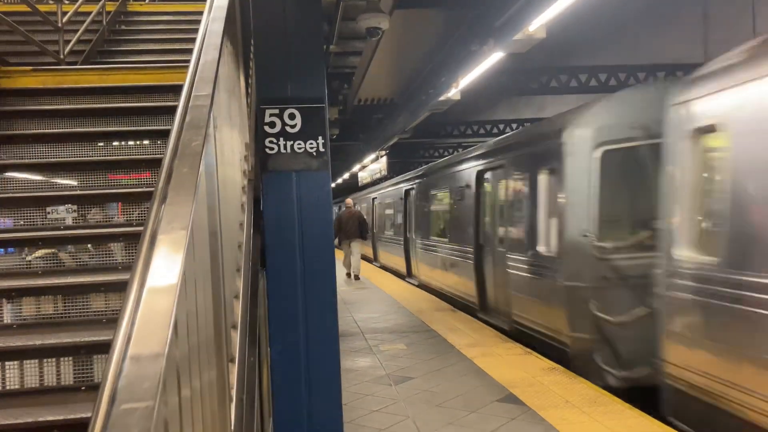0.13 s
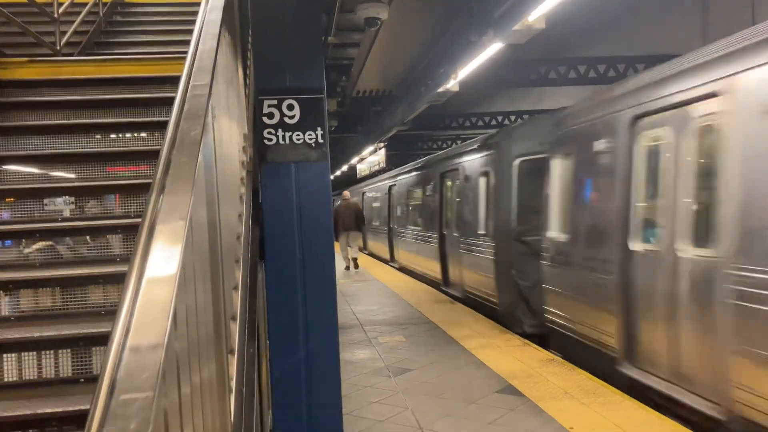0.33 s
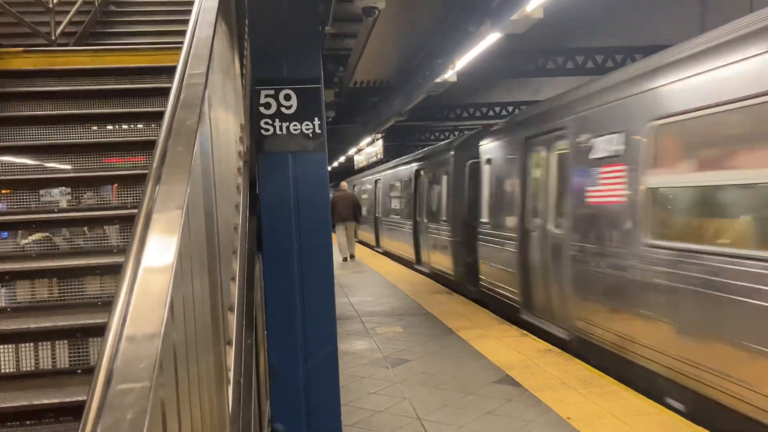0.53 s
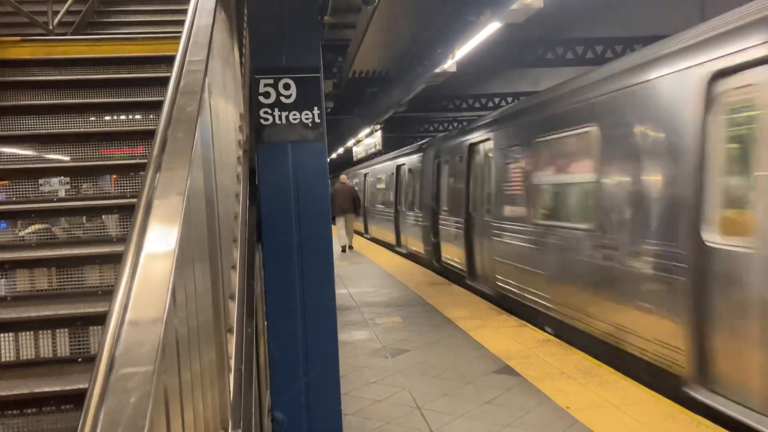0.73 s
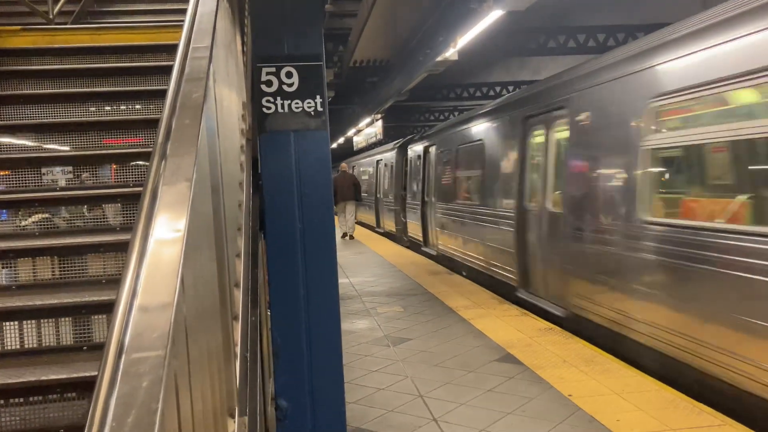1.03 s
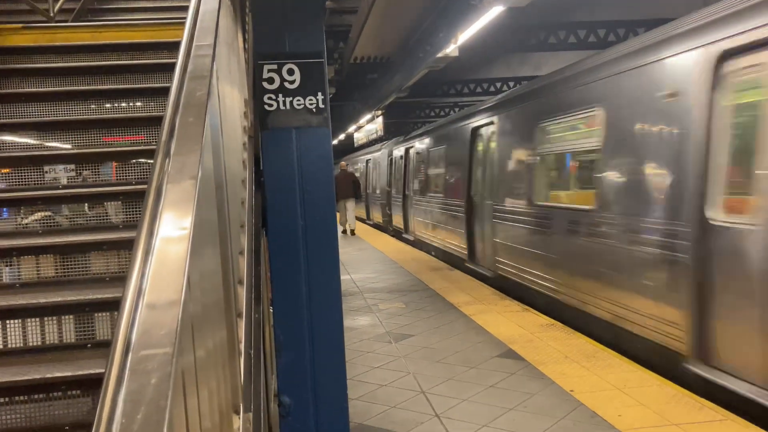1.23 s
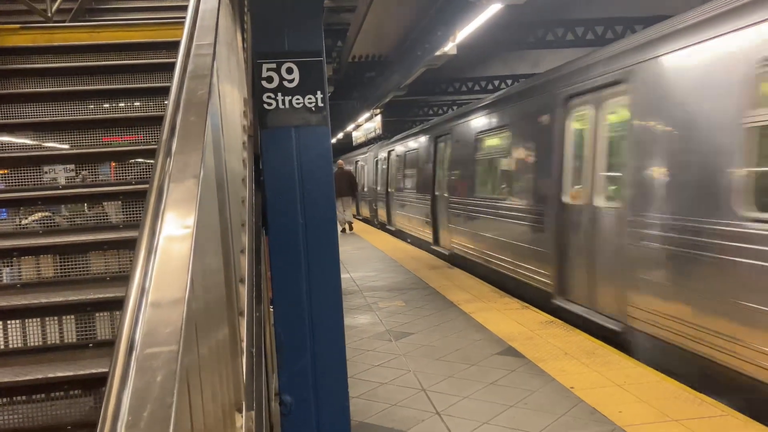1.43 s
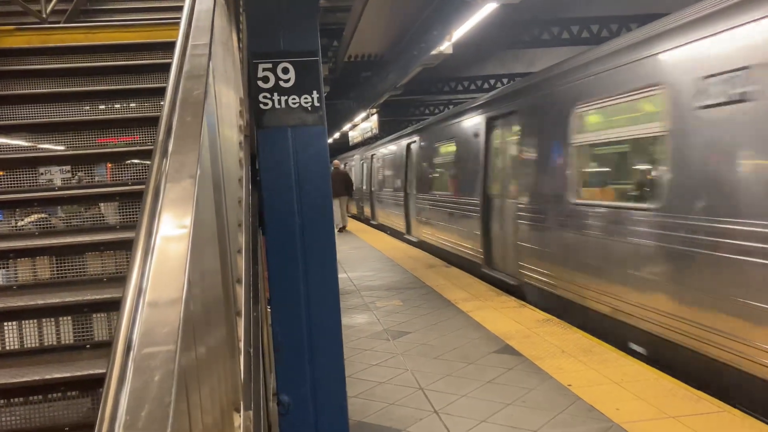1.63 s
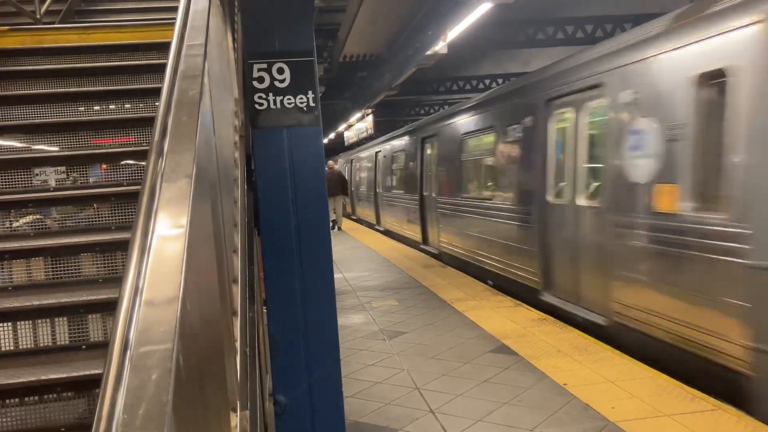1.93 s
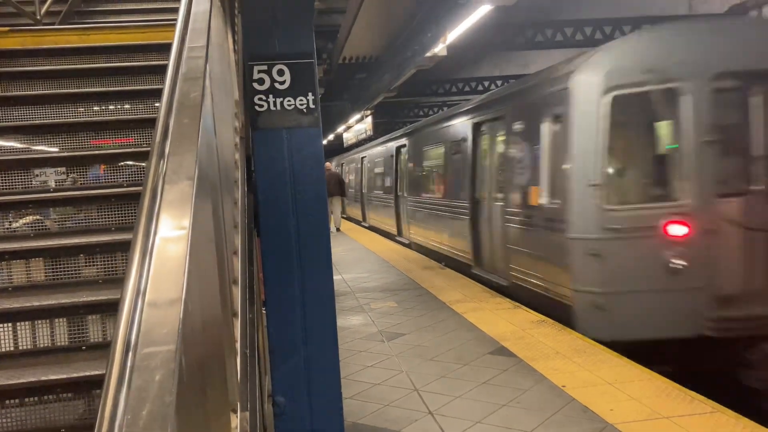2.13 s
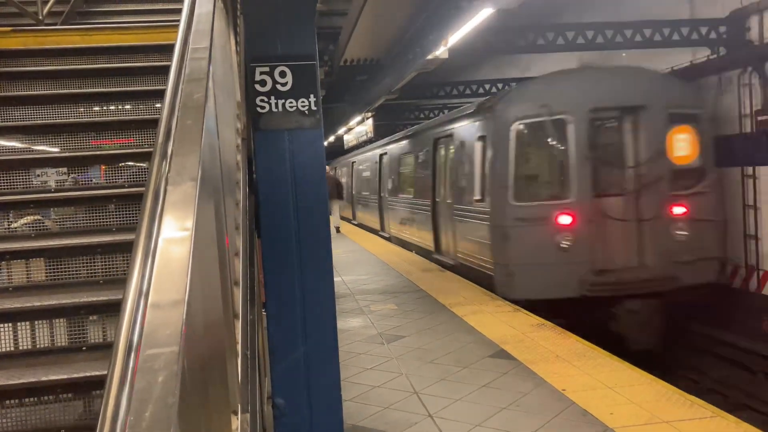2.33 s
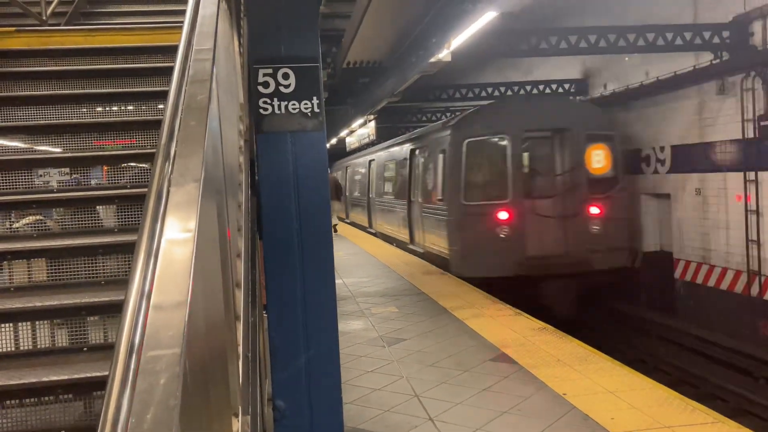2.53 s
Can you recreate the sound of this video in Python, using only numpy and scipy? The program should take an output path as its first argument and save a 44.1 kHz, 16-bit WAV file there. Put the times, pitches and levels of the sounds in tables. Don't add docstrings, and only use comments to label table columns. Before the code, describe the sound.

Close stereo pickup on an underground platform: a train already rolling by roars steadily, with rushing wheels, body jolts, short metallic pings and faint air hiss, then heavier joint knocks and a thin motor hum at the end.

```python
import sys
import numpy as np
from scipy import signal
from scipy.io import wavfile
from scipy.ndimage import uniform_filter1d

SR = 44100
rng = np.random.default_rng(int(sys.argv[2]) if len(sys.argv) > 2 else 0)


def store_pcm(level_fs):
    pcm = np.round(np.clip(level_fs, -1, 1) * 32767).astype(np.int16)
    wavfile.write(sys.argv[1], SR, np.atleast_2d(pcm).T)


def gain_from_db(level_db):
    decades = np.asarray(level_db, float) / 20
    return 10 ** decades


N = 118629

# t/s, roar level/dB, floor shake/dB, howl over the roar/dB
PASSING = [(0, -16.5, -31.5, 4), (.1, -16.5, -36, -1), (.22, -20, -34, 0), (.38, -16, -36.5, -4),
           (.55, -19, -34, 2.5), (.75, -20, -34, 2), (.95, -20.5, -32, 1), (1.18, -19.5, -33, -1),
           (1.4, -20.5, -32, 1.5), (1.55, -20.5, -33.5, 6.5), (1.7, -14, -28.5, 1), (1.83, -21.5, -35.5, 3),
           (1.97, -16.5, -31, 7), (2.12, -17, -32, 5.5), (2.24, -18.5, -27.5, 4.5), (2.33, -14, -31, -4),
           (2.48, -19.5, -30.5, 1.5), (2.69, -17.5, -34, -8)]
# t/s, rolling level/dB, air level/dB
NEARNESS = [(0.0, -32.5, -57), (0.01, -31.5, -52.5), (0.12, -30.5, -54), (0.25, -32, -55), (0.3, -32, -53),
            (0.36, -31.5, -56.5), (0.39, -32.5, -60), (0.98, -33, -66), (1.03, -33.5, -64),
            (1.3, -32.5, -59.5), (1.62, -32.5, -57.5), (1.79, -32, -58), (2.09, -32, -53.5),
            (2.24, -30.5, -53.5), (2.6, -33.5, -60.5), (2.69, -34, -60)]
# f/Hz, density/dB per Hz
RUMBLE_COLOUR = [(22, -34), (32, -4), (48, -1), (75, -3), (105, -6.5), (140, 0.5), (175, -2), (200, -13)]
# f/Hz, density/dB per Hz
ROAR_COLOUR = [(150, -15.5), (200, -5.5), (250, -4), (350, -2.5), (420, -2), (500, -6), (640, -16),
               (1100, -22.5)]
# f/Hz, density/dB per Hz
HOWL_COLOUR = [(430, -3), (520, -0.5), (600, 0), (680, -3), (760, -16.5)]
# f/Hz, likeness 0..1
ROAR_SAME = [(100, 0.86), (300, 0.79), (550, 0.54), (800, 0.57)]
# f/Hz, left minus right/dB
ROAR_TILT = [(140, -2), (330, 1.5), (770, 4)]
# f/Hz, density/dB per Hz
RUSH_COLOUR = [(500, -1.5), (850, -3.5), (1300, -5), (1650, -8.5), (3000, -15), (4000, -17.5),
               (4500, -22.5), (6000, -59.5)]
# f/Hz, likeness 0..1
RUSH_SAME = [(860, .22), (1200, .43), (1550, .5), (2200, .2), (3000, .08), (4300, .2)]
# f/Hz, right lead/rad
RUSH_TURN = [(860, -0.5), (1200, 1.5), (1550, 2.5), (2240, -0.56), (2600, -11.5), (3500, 0), (4200, -1.5)]
# f/Hz, left minus right/dB
RUSH_TILT = [(800, 4.5), (1800, 3.5), (2700, 1.5), (4300, 1), (5000, -7)]
# f/Hz, width/Hz, level/dB
WHEEL_MODES = [(1630, 37, -8.5), (1858, 104, -6), (2063, 30, -6.5), (2470, 180, -8), (2630, 51, -6.5),
               (3180, 63, -10.5), (3690, 39, -33), (4720, 120, -23), (4750, 69, -19.5)]
# f/Hz, density/dB per Hz
HISS_COLOUR = [(4200, -11), (5000, 5), (5400, -3), (6000, -1), (8000, -3.5), (10000, -4.5), (12000, -12),
               (15700, -22)]
# f/Hz, likeness 0..1
HISS_SAME = [(5000, .3), (5600, .7), (6300, .45), (7000, .85), (7700, .75), (9000, .96), (15000, .97)]
# f/Hz, right lead/rad
PORT_TURN = [(4600, 2.9), (5600, 5.4), (6100, 1.4), (6700, .1), (7300, 0.39)]
# f/Hz, width/Hz, level/dB
WHINE_LINES = [(6000, 60, -62), (9790, 80, -69)]
# t/s, level/dB, f/Hz
PINGS = [(.03, -35, 1820), (.59, -29, 1870), (.63, -29, 2460), (.68, -36, 1820), (.93, -24, 1860),
         (.97, -23, 1820), (1.1, -27, 1910), (1.45, -33, 1870), (1.52, -27, 1830), (1.585, -25, 2500),
         (1.7, -27, 1700), (1.75, -36, 2620), (1.89, -22, 1740), (1.95, -26, 2470), (2.1, -28, 1840),
         (2.16, -26, 2095), (2.42, -24, 1870)]
# t/s, level/dB, f/Hz
JOINTS = [(0.078, -7.5, 79), (0.247, -16, 48.7), (0.439, -28, 37.7), (0.964, -35, 43.1), (1.079, -28, 77),
          (1.896, -13, 53.5), (2.079, -13, 53.4), (2.139, -7, 56), (2.249, -9, 98), (2.33, -3.5, 76),
          (2.449, -10, 50)]
# t/s, level/dB, f/Hz
BUMPS = [(.06, -7, 371), (.1, -6, 428), (.17, -7.5, 464), (.23, -12, 425), (.27, -14, 323), (.352, -9, 417),
         (.36, -15, 204), (.41, -11.5, 166.4), (.42, -13.5, 403), (.56, -11.5, 199), (.637, -9, 391),
         (.7, -11, 337.6), (.832, -9, 392), (.985, -13, 339), (1.16, -9, 432), (1.195, -10, 396),
         (1.195, -11.5, 226.5), (1.29, -12.5, 410), (1.42, -8.5, 137), (1.52, -14.5, 559),
         (1.635, -15, 265), (1.67, -7, 446), (1.715, -11, 387), (1.9, -11.5, 430), (2.0, -18, 422),
         (2.03, -6.5, 427), (2.12, -7.5, 331), (2.295, -4.5, 397), (2.31, -10, 453), (2.28, -8, 200),
         (2.29, -19, 251), (2.335, -9, 238), (2.38, -7.5, 363), (2.44, -12.5, 261), (2.5, -9, 279),
         (2.54, -12, 419), (2.585, -9.5, 263)]
# t/s, length/s, level/dB
PUFFS = [
    (0.25, .012, -51),
    (0.297, 0.027, -47.5),
    (2.252, 0.029, -57),
    (2.37, .02, -53),
]
# f/Hz, density/dB per Hz
PUFF_COLOUR = [(5000, -20), (8000, -2), (11000, 1), (13800, 1), (14500, -20)]
# f/Hz, margin/dB
GATE_MARGIN = [(4300, 16), (5300, 8), (7000, 9), (9000, 6.3), (11900, 4.5), (13900, 4.2), (14800, 5),
               (15700, 1.5)]


def evened(x):
    return x / np.sqrt(np.mean(x ** 2) + 1e-20)


def read(points, hz):
    f, value = np.transpose(points)
    return np.interp(np.log(hz + 1), np.log(f + 1), value)


def flat(value):
    return lambda hz: value + 0 * hz


def table(points):
    return lambda hz: read(points, hz)


def closed(points):
    low_hz, high_hz = points[0][0], points[-1][0]

    def colour(hz):
        octaves_outside = abs(np.log2((hz + 1) / np.clip(hz + 1, low_hz, high_hz)))
        return read(points, hz) - 50 * octaves_outside
    return colour


def peaks(rows, hz):
    return sum(gain_from_db(2 * db) / (1 + (2 * (hz - f) / width) ** 2) ** 2 for f, width, db in rows)


def peak_colour(rows):
    return lambda hz: 10 * np.log10(peaks(rows, hz) + 1e-20)


def ports(hz):
    return read(PORT_TURN, hz) + 2 * np.pi * np.maximum(hz - 7150, 0) / 4340


def control(rows, column, follows):
    db = np.interp(np.arange(N) / SR, *np.transpose(rows)[[0, column]])
    return db.mean() + follows * (db - db.mean())


def steadied(x):
    steady_s = 0.22
    power = uniform_filter1d((x ** 2).mean(0), round(steady_s * SR))
    power = uniform_filter1d(power, round(steady_s * SR / 2))
    return x / np.sqrt(abs(power) + 1e-9)


def noise(colour_db, same, turn, tilt_db, patchy_db, flicker_db, size=1024):
    frames, hz = 4 * N // size + 6, np.fft.rfftfreq(size, 1 / SR)
    a, b, c, d, patches = rng.standard_normal((frames, len(hz), 5)).T
    patches = uniform_filter1d(patches, size=10, axis=0)
    patches = evened(uniform_filter1d(patches, size=8, axis=1))
    flicker = evened(uniform_filter1d(rng.standard_normal(frames), size=4))
    likeness = np.clip(same(hz), 0, 1)[:, None]
    left = a + 1j * b
    shared = likeness * left * np.exp(1j * turn(hz))[:, None]
    right = shared + np.sqrt(1 - likeness ** 2) * (c + 1j * d)
    tilt = gain_from_db(tilt_db(hz) / 2)[:, None]
    level = gain_from_db(colour_db(hz)[:, None] + patchy_db * patches + flicker_db * flicker)
    z = np.array([left * tilt, right / tilt]) * level
    return evened(signal.istft(z, nperseg=size, noverlap=3 * size // 4)[1][:, :N])


def knocks(rows, db, rise_s, t60_s):
    out, t = np.zeros(N), np.arange(N) / SR
    for start_s, peak_db, hz in rows:
        u = np.maximum(t - start_s, 0)
        decay = gain_from_db(peak_db + db - 60 * u / t60_s)
        out += decay * (1 - np.exp(-u / rise_s)) * np.sin(2 * np.pi * hz * u)
    return out


def roar():
    turn = table([(200, -0.44), (520, -0.59), (900, 3.0)])
    same, tilt = table(ROAR_SAME), table(ROAR_TILT)
    boom = noise(closed(ROAR_COLOUR), same, turn, tilt, patchy_db=0.74, flicker_db=0.062, size=2048)
    howl = noise(closed(HOWL_COLOUR), same, turn, tilt, patchy_db=1.0, flicker_db=0.082, size=2048)
    roar_db = control(PASSING, column=1, follows=0.7)
    howl_db = roar_db - 7.0 + control(PASSING, column=3, follows=0.83)
    return gain_from_db(roar_db + 0.5) * steadied(boom) + gain_from_db(howl_db) * steadied(howl)


def rumble():
    same = table([(40, 1.0), (80, 0.87)])
    floor = noise(closed(RUMBLE_COLOUR), same, flat(0), flat(-0.8), patchy_db=0.32, flicker_db=0.2, size=4096)
    db = control(PASSING, column=2, follows=0.75)
    return gain_from_db(-25 + db - db.mean()) * steadied(floor)


def rush():
    def colour(hz):
        return 10 * np.log10(gain_from_db(2 * closed(RUSH_COLOUR)(hz)) + peaks(WHEEL_MODES, hz))
    rolling = noise(colour, table(RUSH_SAME), table(RUSH_TURN), table(RUSH_TILT),
                    patchy_db=1.34, flicker_db=0.35, size=2048)
    return gain_from_db(control(NEARNESS, column=1, follows=1.9) + 3.5) * steadied(rolling)


def hiss():
    air = noise(closed(HISS_COLOUR), table(HISS_SAME), ports, flat(-.1),
                patchy_db=1.15, flicker_db=0.6, size=512)
    return gain_from_db(control(NEARNESS, column=2, follows=0.56) + 11.5) * air


def whine():
    level = np.sqrt(sum(gain_from_db(2 * db) for _, _, db in WHINE_LINES))
    lines = level * noise(peak_colour(WHINE_LINES), flat(1.0), ports, flat(.1),
                          patchy_db=1.5, flicker_db=.4, size=2048)
    top_line = [(14830, 280, 0)]  # f/Hz, width/Hz, level/dB
    sizzle = gain_from_db(-69) * noise(peak_colour(top_line), flat(0.53), flat(1.2), flat(.1),
                              patchy_db=1.5, flicker_db=.4)
    db = control(NEARNESS, column=2, follows=0.84)
    return gain_from_db(db - db.mean()) * (lines + sizzle)


def pings():
    return knocks(PINGS, db=-4.5, rise_s=0.015, t60_s=0.17) * gain_from_db(np.array([[2.5], [-2.5]]))


def joints():
    floor = knocks(JOINTS, db=-0.5, rise_s=0.027, t60_s=0.13)
    body = knocks(BUMPS, db=0.8, rise_s=.012, t60_s=.16)
    return floor + body * gain_from_db(np.array([[.7], [-.7]]))


def puffs():
    t = np.arange(N) / SR
    shape = sum(gain_from_db(db) * np.exp(-((t - s) / length) ** 4) for s, length, db in PUFFS)
    return shape * noise(closed(PUFF_COLOUR), flat(0.7), ports, flat(.1),
                         patchy_db=1.0, flicker_db=1.8, size=256)


def hum():
    from_s, to_s, fade_s = 1.95, 3.1, .12
    t = np.arange(N) / SR
    fade = np.clip(np.minimum(t - from_s, to_s - t) / fade_s, 0, 1)
    sag = gain_from_db(-1.5 * (t - from_s))
    wander = evened(uniform_filter1d(rng.standard_normal(N), size=4000))
    turn = 2 * np.pi * np.cumsum(1047 + 0.56 * wander) / SR
    turn = turn + np.array([[0], [.8]])
    tone = np.sin(turn) + gain_from_db(-13) * np.sin(2 * turn)
    return gain_from_db(-37.5) * fade * sag * tone * gain_from_db(np.array([[1.5], [-1.5]]))


def gated(x, size=8):
    lead = 48
    mid_side = np.array([x[0] + x[1], x[0] - x[1]]) / 2
    hz, _, z = signal.stft(np.pad(mid_side, ((0, 0), (lead, 0))), SR, "cosine", nperseg=2048)
    power = (abs(z[:, :-1]) ** 2).reshape(2, -1, size, z.shape[2]).mean(axis=2)
    around = uniform_filter1d(power.sum(axis=0), size=9, axis=0)
    around = uniform_filter1d(around, size=5, axis=1)
    margin_db = np.where(hz < GATE_MARGIN[0][0], 200, read(GATE_MARGIN, hz))
    margin_db = margin_db[size // 2::size, None]
    keep = np.repeat(power > around / gain_from_db(2 * margin_db), size, axis=1)
    z = z * np.pad(keep, ((0, 0), (0, 1), (0, 0)))
    mid, side = signal.istft(z, SR, "cosine", nperseg=2048)[1][:, lead:lead + N]
    return np.array([mid + side, mid - side])


def scene():
    rolling = roar() + rumble() + rush() + hiss() + whine()
    return rolling + pings() + joints() + puffs() + hum()


def low_pass(x):
    return signal.sosfilt(signal.butter(12, 17060, fs=SR, output="sos"), x)


def record(dry):
    low_cut = signal.butter(4, 31, "high", fs=SR, output="sos")
    edge = signal.firwin(511, 15800, window=("kaiser", 9), fs=SR)
    cut = signal.sosfilt(low_cut, dry)
    mix = gated(signal.oaconvolve(cut, edge[None], "same"))
    return low_pass(mix)


dry = scene()
out = record(dry)
store_pcm(out)
```